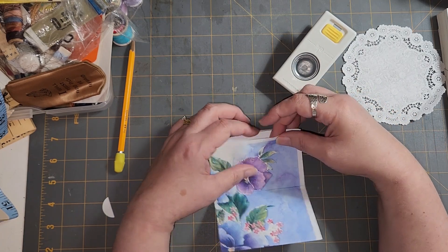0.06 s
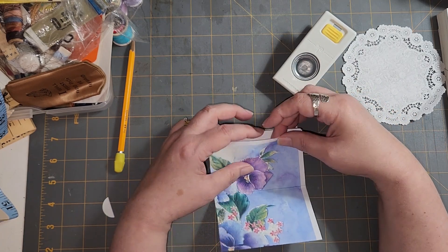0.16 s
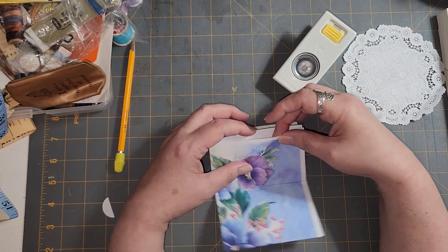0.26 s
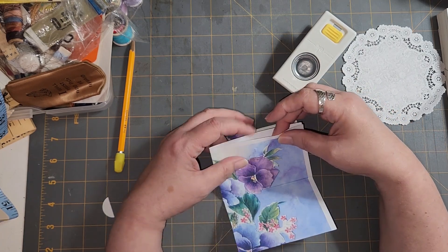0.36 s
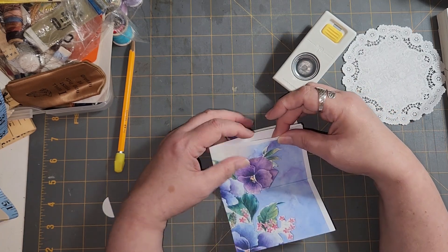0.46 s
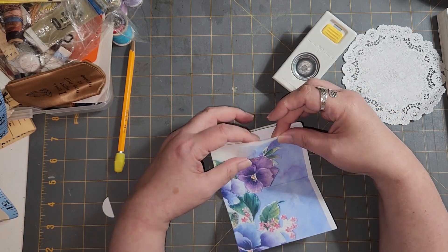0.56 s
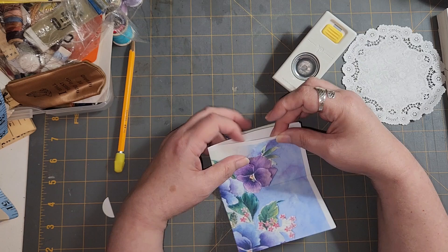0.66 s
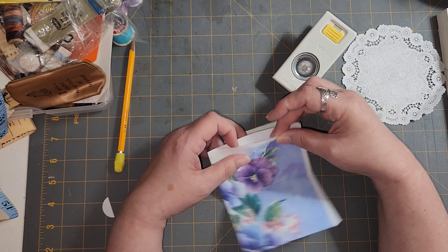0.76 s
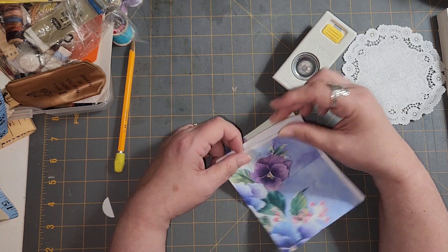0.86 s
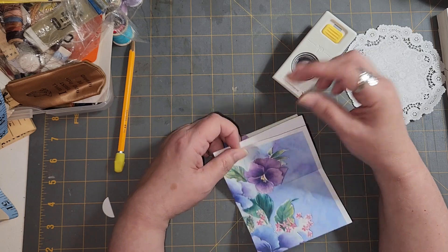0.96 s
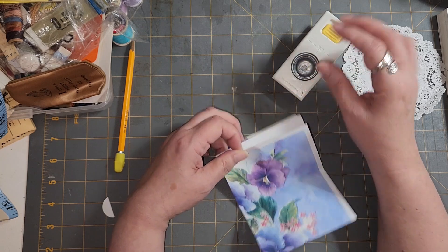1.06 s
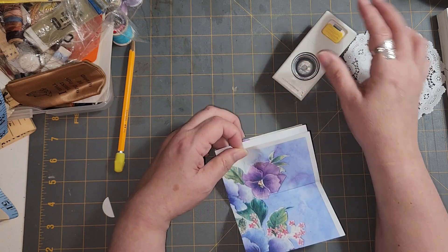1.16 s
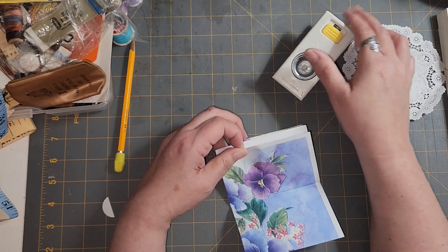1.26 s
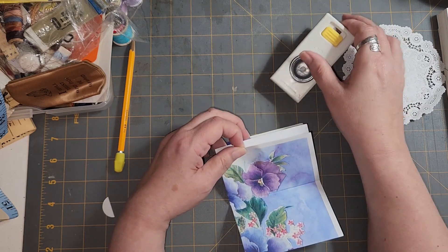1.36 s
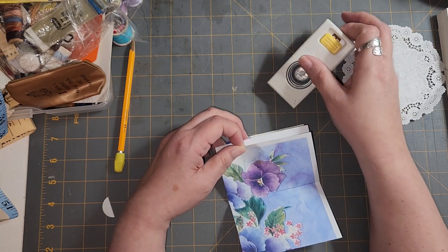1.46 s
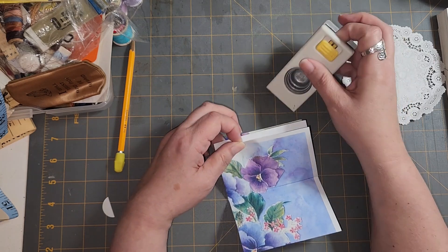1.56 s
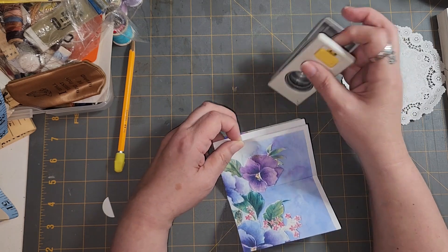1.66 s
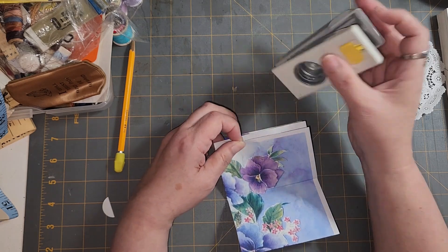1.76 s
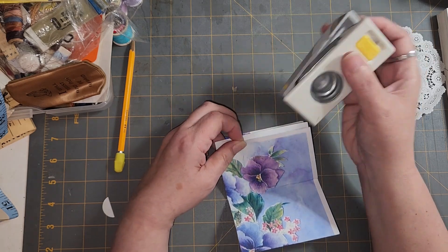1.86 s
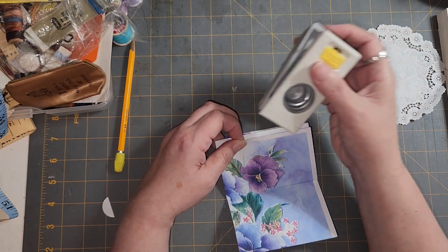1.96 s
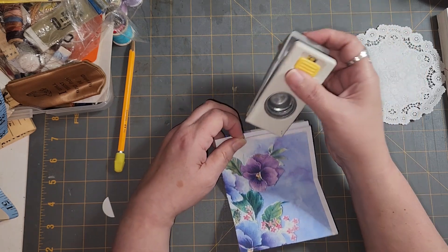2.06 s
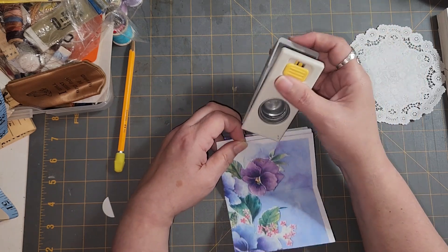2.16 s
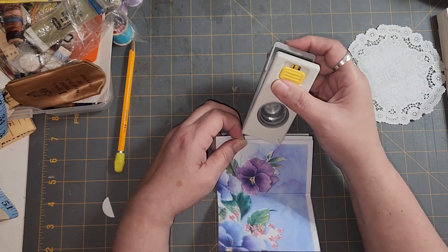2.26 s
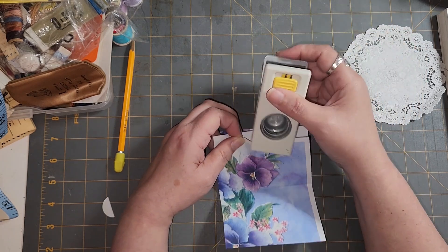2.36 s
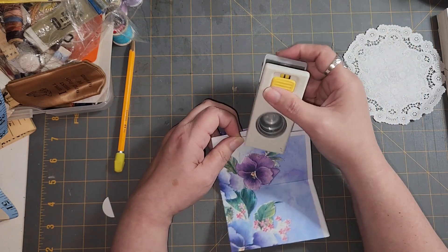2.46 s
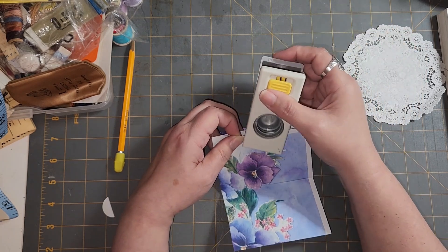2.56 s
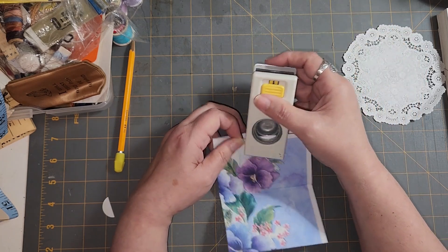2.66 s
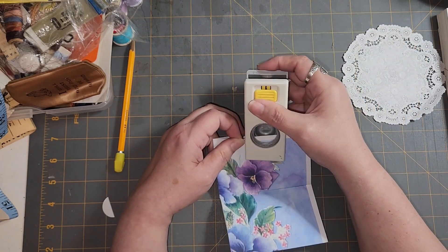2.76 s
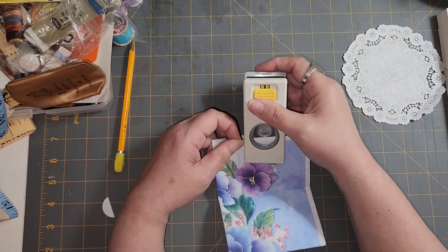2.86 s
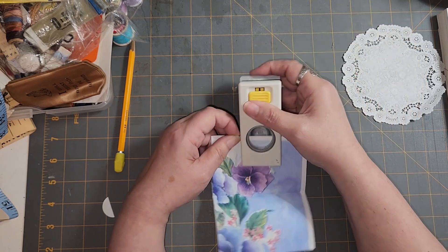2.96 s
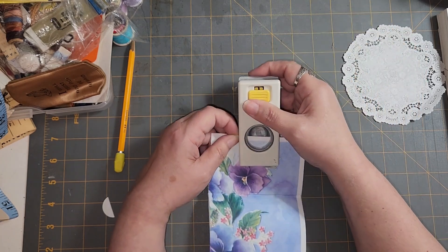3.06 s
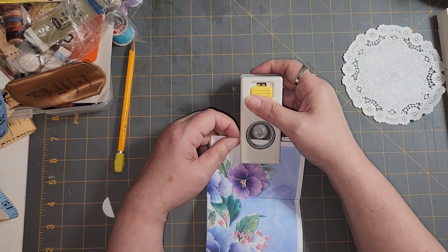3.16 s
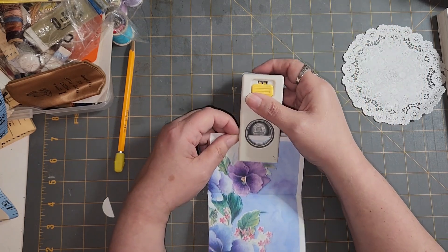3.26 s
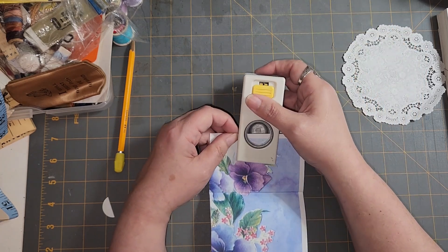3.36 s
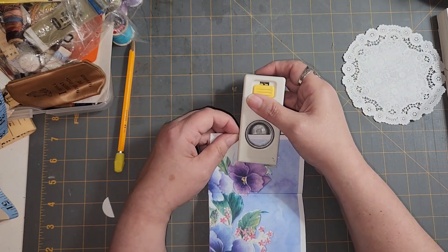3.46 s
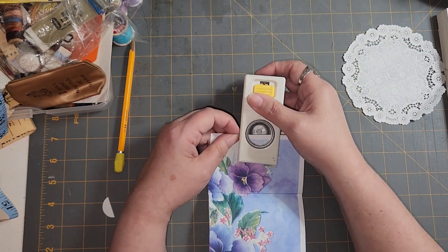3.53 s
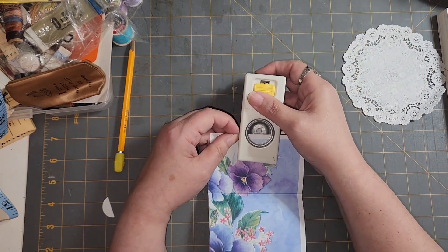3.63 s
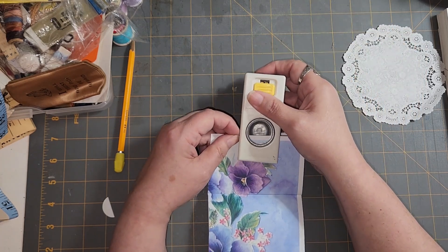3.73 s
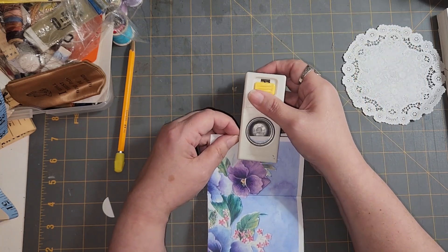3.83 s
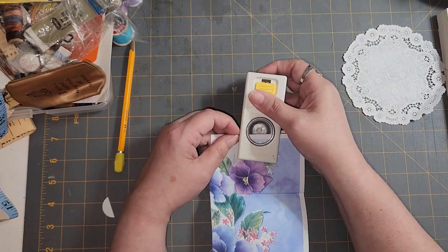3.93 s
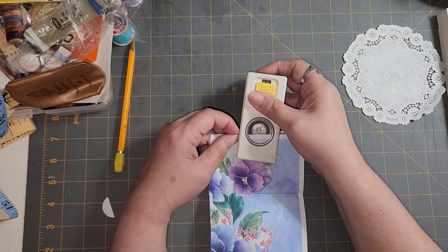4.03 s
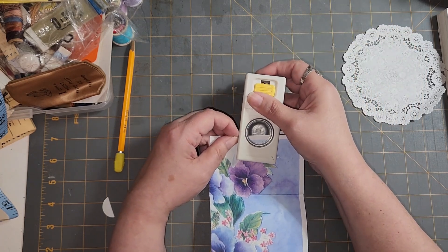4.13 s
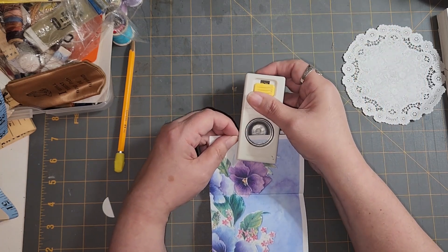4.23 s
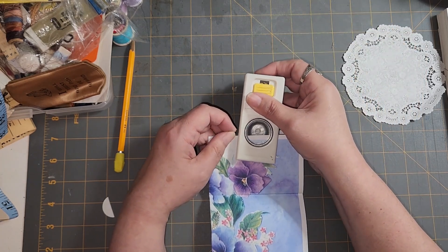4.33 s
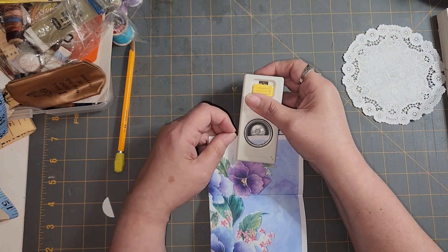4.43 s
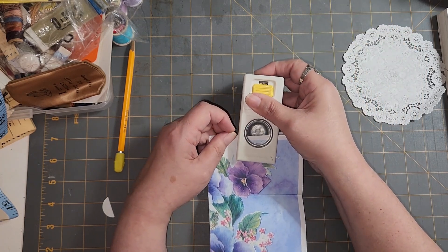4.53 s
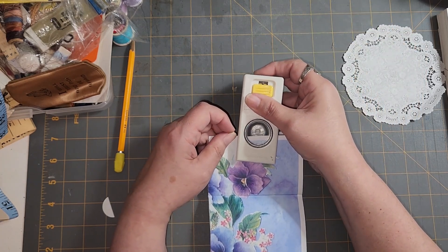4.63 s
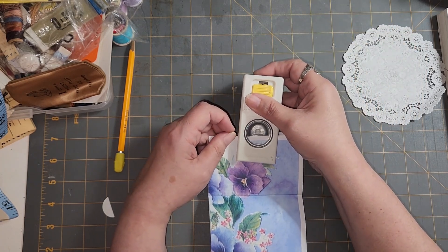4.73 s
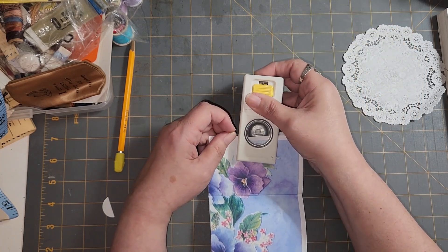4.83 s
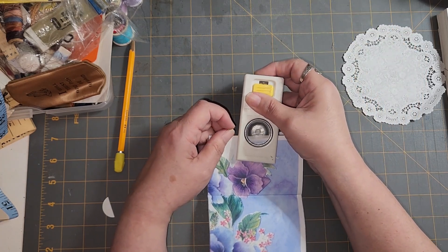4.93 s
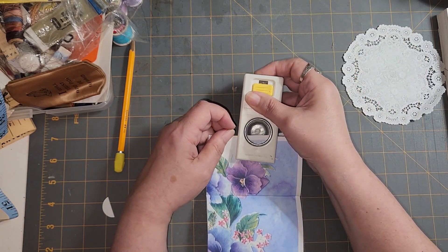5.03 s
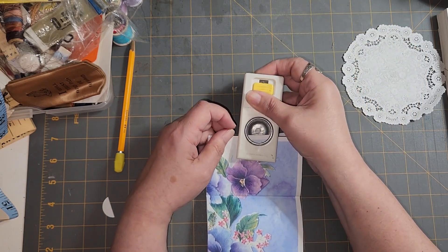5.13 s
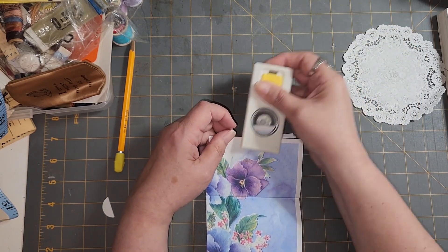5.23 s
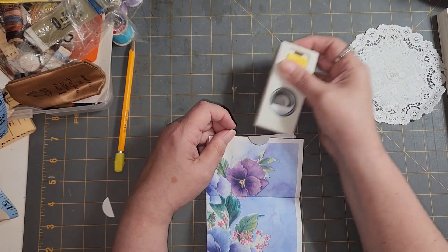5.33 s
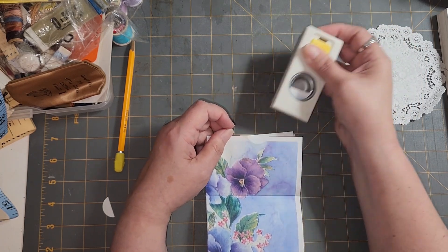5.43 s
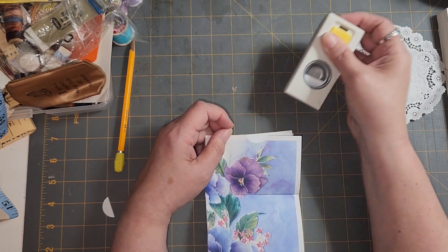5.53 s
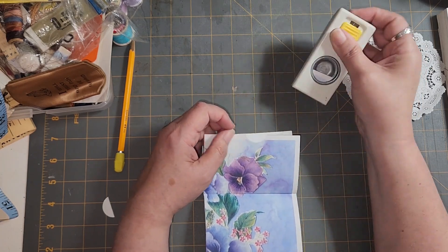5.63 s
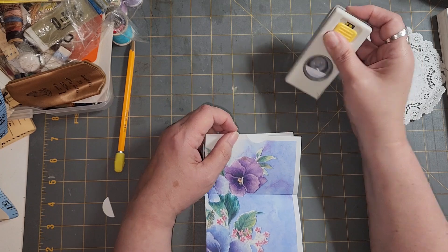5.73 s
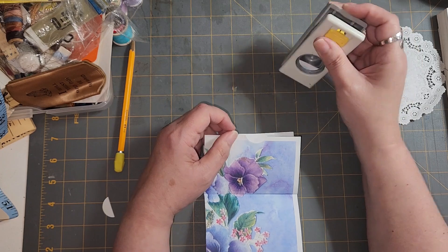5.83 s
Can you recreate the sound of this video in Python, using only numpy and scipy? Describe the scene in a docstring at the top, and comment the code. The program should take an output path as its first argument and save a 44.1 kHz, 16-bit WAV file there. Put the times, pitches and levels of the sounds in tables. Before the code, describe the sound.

Close stereo pickup at a craft desk in a small, softly humming room. Card slides and crackles on a mat, then a dull thump as a punch is grabbed. It clacks and rattles onto the card, which rubs into the slot. The case creaks, the die bites with a crunch, snaps hard at about five seconds, and a spring creaks at the end.

```python
"""A small room with a low hum: hands slide a folded paper card over a cutting mat and pick up a lever punch.
They work the card into its slot and squeeze: the case creaks, the desk thumps, the die snaps through.
The punch is lifted off and its spring creaks as it opens.
Contacts are struck modes and noise bursts, rubbing is grainy filtered noise, the spring sticks and slips."""
import sys
import numpy as np
from scipy import signal
from scipy.fft import rfft, irfft, next_fast_len
from scipy.io import wavfile
from scipy.ndimage import uniform_filter1d, map_coordinates

SR = 44100
rng = np.random.default_rng(int(sys.argv[2]) if len(sys.argv) > 2 else 0)


def log_audio(samples):
    """Write samples as a 16-bit WAV file to the path given in sys.argv[1]."""
    # one column per channel
    frames = np.atleast_2d(samples).T
    # limit to full scale, then quantise
    limited = np.clip(frames, -1, 1)
    pcm = np.round(limited * 32767).astype(np.int16)
    wavfile.write(sys.argv[1], SR, pcm)


N = 259749
T = np.arange(SR // 2) / SR  # time since a contact [s]


def amp(db):
    """Amplitude factor of a level in dB."""
    return 10 ** (np.asarray(db) / 20)


def unit(x):
    """Scale to rms 1."""
    return x / np.sqrt(np.mean(x ** 2) + 1e-20)


def crest(x):
    """Scale so that the loudest 4 ms have rms 1."""
    power = np.mean(np.atleast_2d(x) ** 2, axis=0)
    return x / np.sqrt(uniform_filter1d(power, size=176, mode="constant").max())


def along(points, hz):
    """Interpolate (Hz, value) points on a log frequency axis."""
    f, v = np.transpose(points)
    return np.interp(np.log(hz + 1), np.log(f + 1), v)


def wobble(rate_hz):
    """A smooth random curve with rate_hz knots a second."""
    knots = rng.standard_normal(int(N * rate_hz / SR) + 4)
    return map_coordinates(knots, [np.arange(N) * rate_hz / SR])


def filtered(x, response):
    """Apply a response of frequency to x."""
    n = x.shape[-1]
    m = next_fast_len(n + 2048)
    return irfft(rfft(x, m) * response(np.fft.rfftfreq(m, 1 / SR)), m)[..., :n]


def band(hz, lo_hz, hi_hz):
    """Gain of a steep band-pass."""
    return ((1 + (lo_hz / (hz + 1)) ** 8) * (1 + (hz / hi_hz) ** 8)) ** -.5


# Stereo width: (frequency [Hz], left-right correlation [0-1])
LIKENESS = [(200, 0.79), (1200, 0.61), (2500, 0.6), (5000, 0.16), (9000, 0)]


def spread(pair, colour):
    """Two unrelated signals become a coloured stereo pair, alike in the bass and unrelated in the treble."""
    def mid_side_gain(hz):
        turn = np.arccos(np.clip(along(LIKENESS, hz), -1, 1)) / 2
        return colour(hz) * np.array([np.cos(turn), np.sin(turn)])
    mid, side = filtered(pair, mid_side_gain)
    return unit(np.array([mid + side, mid - side]))


def noise(n):
    """Two unrelated channels of white noise."""
    return rng.standard_normal((2, n))


def decay(t, t60, attack):
    """A quick rise and an exponential fall, both times in s."""
    return (1 - np.exp(-t / attack)) * np.exp(-np.log(1000) * t / t60)


def burst(colour, t60, attack):
    """A dense cluster of short-lived modes, in stereo, that builds up while the contact lasts."""
    t = T[:SR // 8]
    x = spread(noise(len(t)), colour) * decay(t, t60, attack)
    return crest(x * (1 - np.exp(-t / attack)))


def ring(modes, attack, scatter_db):
    """Decaying sine modes, struck at new strengths each time."""
    out = np.zeros(len(T))
    for hz, db, t60 in modes:
        strength = amp(db + scatter_db * rng.standard_normal())
        out += strength * np.sin(2 * np.pi * hz * T) * decay(T, t60, attack)
    return out


def add(track, s, x):
    """Mix x into the track from time s."""
    start = max(round(s * SR), 0)
    part = track[..., start:start + x.shape[-1]]
    part += x[..., :part.shape[-1]]


# Still air: (frequency [Hz], relative density [dB per Hz])
AIR_SPECTRUM = [(25, -5.5), (100, -1.5), (190, -12), (700, -19), (2000, -15.5), (6000, -24.5),
                (16000, -38.5)]
# Higher hum before its waver: (time [s], level [dB])
HUM_SWELL_CURVE = [(2.6, -77.5), (3.15, -68), (3.5, -69.5), (4.1, -78.5)]
DEEP_HUM_HZ, DEEP_HUM_DB, HIGH_HUM_HZ = 48.4, -76, 237.6


def background(air_db):
    """Room air as shaped noise, and two sine hums wavering in level and phase; the higher one swells."""
    t = np.arange(N) / SR

    def hum(hz, db):
        level = amp(db + 2.5 * wobble(3))
        return level * np.sin(2 * np.pi * hz * t + 0.72 * wobble(11))

    air = spread(noise(N), lambda f: amp(along(AIR_SPECTRUM, f)))
    high_hum = hum(HIGH_HUM_HZ, np.interp(t, *np.transpose(HUM_SWELL_CURVE)))
    return amp(air_db) * air + hum(DEEP_HUM_HZ, DEEP_HUM_DB) + high_hum


# Metal modes of the punch: (frequency [Hz], level [dB], t60 [s])
PUNCH_MODES = [(1675, 7, 0.019), (1831, 8, 0.0084), (1936, 14, 0.019), (2610, -5.5, 0.042),
               (3020, -20, 0.07), (3036, -16.5, 0.11), (3650, 0, 0.036), (4175, 3, 0.039),
               (4950, -5, 0.051), (6540, -37, 0.22)]
# Bright crack of the metal: (frequency [Hz], relative density [dB per Hz])
CRACK_SPECTRUM = [(2500, -27), (4200, 8.5), (6000, 9), (8000, 3), (10500, 4.5), (16000, -7)]


def metal(modes_db, clatter_db, crack_db, crack_t60, crack_attack, clatter_t60):
    """Struck metal: its modes, a short clatter and a bright crack."""
    out = np.zeros((2, len(T)))
    detune = 1 + 0.015 * rng.standard_normal(len(PUNCH_MODES))  # the grip retunes the metal at every blow
    modes = [(f * d, db, t60) for (f, db, t60), d in zip(PUNCH_MODES, detune)]
    out += amp(modes_db) * crest(ring(modes, crack_attack, scatter_db=5.5))
    add(out, 0, amp(clatter_db) * burst(lambda f: band(f, 1070, 2920), clatter_t60, crack_attack))
    crack = burst(lambda f: amp(along(CRACK_SPECTRUM, f)), crack_t60, crack_attack)
    add(out, 0, amp(crack_db) * crack)
    return out


# Close modes of the plastic case: (ratio to its pitch [1], level [dB])
CASE_MODES = [(1, -3), (.93, -3), (1, -11.5), (0.94, 0)]


def shell(hz, t60, attack):
    """The plastic case rings briefly with a cluster of close modes."""
    modes = [(hz * ratio, db, t60) for ratio, db in CASE_MODES]
    return np.ones((2, 1)) * crest(ring(modes, attack, scatter_db=7))


def knock():
    """The dull answer of the mat: a burst of low-band noise."""
    return burst(lambda f: band(f, 274, 570), t60=0.11, attack=0.00016)


# Card and punch tap the mat and each other:
# (time [s], case pitch [Hz], level [dB], contact softness as low-pass cut-off [Hz], clatter t60 [s])
TAP_EVENTS = [(0.0186, 1033, -42, 4200, 0.01), (0.111, 1120, -54.5, 3500, .025),
              (0.42, 1170, -52.5, 2500, .06), (1.008, 1224, -43, 1500, 0.033),
              (1.333, 1154, -51.5, 500, 0.033), (2.162, 1190, -41, 3270, 0.012),
              (2.261, 1090, -45, 4380, 0.013), (2.4456, 1370, -26, 17000, 0.014),
              (2.544, 1196, -39, 3940, 0.044), (2.578, 913, -44.5, 2480, .022),
              (2.618, 1106, -44, 3680, 0.042), (2.836, 1384, -33, 3220, 0.054),
              (3.1544, 1430, -35, 4400, 0.022), (4.314, 1230, -43.5, 1670, .06),
              (4.433, 1408, -32, 4900, 0.026), (5.197, 1220, -49, 804, .04),
              (5.446, 1417, -56.5, 708, 0.031), (5.518, 1440, -60, 1200, 0.033)]
KNOCK_GROWTH_DB_PER_DB = 0.05  # lighter taps reach the mat relatively less


def taps():
    """A softer contact rings the case but hardly the metal, a glancing one clatters longer."""
    out = np.zeros((2, N))
    loudest_db = max(row[2] for row in TAP_EVENTS)
    for s, hz, db, soft_hz, t60 in TAP_EVENTS:
        die = metal(modes_db=0.5, clatter_db=2.5, crack_db=2.0,
                    crack_t60=t60 / 2, crack_attack=0.0011, clatter_t60=t60)
        softener = signal.butter(2, min(soft_hz, 0.45 * SR), fs=SR)
        knock_db = db - 18 + KNOCK_GROWTH_DB_PER_DB * (db - loudest_db)
        add(out, s, amp(db) * signal.lfilter(*softener, die))
        add(out, s, amp(db - 2.5) * shell(hz, t60=0.051, attack=0.00064))
        add(out, s, amp(knock_db) * knock())
    return out


FADE_DB_PER_S = 385  # outside a movement


def movement(curve):
    """Strength of one continuous rubbing movement, dying away outside it."""
    t = np.arange(N) / SR
    s, db = np.transpose(curve)
    outside_s = np.abs(t - np.clip(t, s[0], s[-1]))
    return amp(np.interp(t, s, db) - FADE_DB_PER_S * outside_s)


def strokes(rows, roundness):
    """Strength of separate strokes, each speeding up and slowing."""
    t = np.arange(N) / SR
    out = np.zeros(N)
    for s, half_s, db in rows:
        distance = np.minimum(np.abs((t - s) / half_s), 10)
        out += amp(db) * np.exp(-distance ** roundness)
    return out


def patchy(x, depth_db):
    """The colour drifts as other parts of the surfaces touch: a smoothed random gain over time and pitch."""
    z = signal.stft(x, nperseg=512)[2]
    field = rng.standard_normal(z.shape[1:])
    field = uniform_filter1d(uniform_filter1d(field, size=6, axis=0), size=7, axis=1)
    return unit(signal.istft(z * amp(depth_db * unit(field)), nperseg=512)[1][:, :N])


def friction(strength, spectrum, grain_db, crinkle_db, patchy_db, rasp_db, hiss_db):
    """Fibres catch and let go in clumped grains, a rasp with a fine hiss above it."""
    catches = unit(amp(grain_db * wobble(700)))
    crinkles = unit(amp(crinkle_db * np.clip(wobble(220) - 1, 0, 1)))  # occasional snags of an edge

    def grains(grip, lo_hz, hi_hz):
        return spread(grip * noise(N), lambda f: amp(along(spectrum, f)) * band(f, lo_hz, hi_hz))

    rasp = patchy(grains(catches * crinkles, 346, 6070), patchy_db)
    hiss = grains(catches, 4320, 19000)
    return strength * (amp(rasp_db) * rasp + amp(hiss_db) * hiss)


# Card slides over the mat: (time [s], rubbing strength [dB])
SLIDE_CURVE = [(0.03, -53.5), (0.128, -58), (0.156, -49.5), (0.244, -75.5), (0.266, -54.5), (0.344, -58.5),
               (0.376, -45), (0.518, -87), (0.55, -58.5), (0.612, -79), (0.636, -58.5), (0.646, -62),
               (0.838, -56), (0.862, -43), (0.902, -38), (0.92, -49.5), (1.068, -59.5), (1.132, -51.5),
               (1.208, -58.5)]
# Card on mat: (frequency [Hz], relative density [dB per Hz])
CARD_SPECTRUM = [(180, -60), (300, -3.5), (360, -12), (725, -12), (1970, 1.5), (3000, -3), (11900, -6.5),
                 (16000, -14)]


def slide():
    """The card rubs along the mat: grainy noise under a strength curve."""
    return friction(movement(SLIDE_CURVE), CARD_SPECTRUM, grain_db=1.5, crinkle_db=-1,
                    patchy_db=2.5, rasp_db=-2.5, hiss_db=-2.0)


def crackles(strength, rate_hz, pitch_hz, level_db, scatter_db):
    """Edges of the rubbing card snag and flick free at random times, each tick with its own size and pitch."""
    out = np.zeros((2, N))
    t = T[:SR // 80]
    for where, size, height in rng.random((int(rate_hz * N / SR), 3)):
        hz = pitch_hz * 4 ** (height - .5)
        edges_hz = [hz / 1.5, min(hz * 1.5, .45 * SR)]
        flick = noise(len(t)) * decay(t, t60=0.011, attack=0.00011)
        crossed = flick + flick[::-1] / 2  # narrows the stereo
        body = signal.lfilter(*signal.butter(2, edges_hz, "bandpass", fs=SR), crossed)
        add(out, where * N / SR, amp(level_db - scatter_db * np.sqrt(size)) * crest(body))
    return strength * out


# Dull low thuds on the mat, a soft tap and then the punch rocking:
# (time [s], peak level of the modes [dB], contact softness as cut-off [Hz])
THUD_EVENTS = [(0.23, -54, 700), (1.392, -44, 200), (1.468, -30.5, 400), (1.487, -19.5, 746),
               (1.677, -44.5, 405)]
# Mat modes: (frequency [Hz], level [dB], t60 [s])
MAT_MODES = [(121, -11, 0.2), (163, -6.5, 0.18), (234.7, -5, 0.27), (264.4, 13, 0.034), (319.4, -13, 0.29),
             (479, -8, 0.021), (757, -19.5, 0.079)]


def thuds():
    """Dull low thuds ring the mat; a softer contact leaves the upper modes and the knock weaker."""
    out = np.zeros((2, N))
    for s, db, soft_hz in THUD_EVENTS:
        modes = [(hz, level - 20 * np.log10(1 + (hz / soft_hz) ** 2), t60) for hz, level, t60 in MAT_MODES]
        thud = ring(modes, attack=0.00155, scatter_db=0.5)
        add(out, s, amp(db) * thud / np.abs(thud).max())
        add(out, s, amp(db - 16.0) * knock() / (1 + (430 / soft_hz) ** 2))
    return out


# Small metallic ticks of the lever, finger ring and spring:
# (time [s], level [dB], crack relative to that level [dB])
CLICK_EVENTS = [(0.632, -58.5, 4), (1.247, -59.5, -27), (1.363, -49, -3), (1.467, -50.5, -7),
                (1.485, -45.5, -6.5), (1.563, -52, -5.5), (1.697, -63, 7.5), (1.863, -58.5, 1),
                (1.902, -51.5, 7), (2.005, -55.5, 9.5), (2.421, -42.5, -1), (4.736, -60.5, -1),
                (5.107, -59, 6.5), (5.189, -56.5, 1.5), (5.733, -54.5, 3.5), (5.775, -55.5, 3.5)]


def clicks():
    """Small metallic ticks: struck metal without case or mat."""
    out = np.zeros((2, N))
    for s, db, crack_db in CLICK_EVENTS:
        tick = metal(modes_db=0.0, clatter_db=-0.5, crack_db=crack_db,
                     crack_t60=0.016, crack_attack=0.0015, clatter_t60=0.041)
        add(out, s, amp(db) * tick)
    return out


# Card edge drags over the mat: (middle time [s], half length [s], level [dB])
SCUFF_STROKES = [(0.757, .018, -56.5), (1.968, .013, -56.5), (2.999, 0.019, -47)]
SCUFF_HZ, SCUFF_WIDTH_HZ = 1940, 260  # resonance of the dragged edge


def scuffs():
    """The dragged edge sings for a moment: grainy rubbing through one narrow resonance."""
    grains = unit(amp(4 * wobble(300))) * noise(N)
    edge = spread(grains, lambda f: 1 / (1 + ((f - SCUFF_HZ) / SCUFF_WIDTH_HZ) ** 2))
    return strokes(SCUFF_STROKES, roundness=2) * edge


# Grabbing and squeezing jolts the desk: (time [s], peak level [dB])
JOLT_EVENTS = [(1.392, -31.5), (4.002, -50), (4.159, -44.5), (4.243, -41.5), (4.281, -39.5), (4.875, -34),
               (4.967, -33.5), (5.001, -40.5), (5.021, -30.5)]
# Desk modes: (frequency [Hz], level [dB], t60 [s])
DESK_MODES = [(50, -13.5, 0.49), (94.3, -3, 0.23), (121.6, -3.5, 0.13), (158, -5, 0.0565),
              (235.5, -10.5, 0.077)]


def jolts():
    """Low modes of the desk top, struck through the punch."""
    out = np.zeros((2, N))
    for s, db in JOLT_EVENTS:
        jolt = ring(DESK_MODES, attack=0.0027, scatter_db=6)
        add(out, s, amp(db) * jolt / np.abs(jolt).max())
    return out


# Hand shifts its hold on the punch: (middle time [s], half length [s], rubbing strength [dB])
HOLD_STROKES = [(1.445, 0.022, -58), (1.56, 0.069, -65.5), (1.99, 0.063, -62), (3.96, 0.013, -56.5),
                (5.33, 0.037, -57), (5.71, 0.042, -64.5)]
# Rubbing at the punch and its slot: (frequency [Hz], relative density [dB per Hz])
SLOT_SPECTRUM = [(180, -41), (300, -15), (656, -14.5), (1780, 0), (3200, -10), (6410, -13), (8360, -18),
                 (9390, -16), (16000, -26)]


def hold():
    """The hand rubs on the punch in short strokes of grainy noise."""
    return friction(strokes(HOLD_STROKES, roundness=1.14), SLOT_SPECTRUM, grain_db=1.5, crinkle_db=3.5,
                    patchy_db=0, rasp_db=1.0, hiss_db=0.0)


# Spring flexes: (time [s], length [s], level before swell and chance [dB], strongest pitch at the start [Hz])
FLEX_EVENTS = [(1.734, 0.005, -53, 3000), (1.896, 0.005, -44.5, 1970), (5.7945, 0.09, -42.5, 2760)]
# Spring modes at the start of a flex: (frequency [Hz], level [dB])
SPRING_MODES = [(1530, 2), (1930, -0.5), (2220, 1), (2740, -4.5), (2920, 0.5), (4240, 5), (6450, 0)]
SLIP_S, SLIP_SCATTER = 0.0128, 0.12  # slip to slip, its share of chance
SAG_OCT_PER_S, FOCUS_DB_PER_OCT = 5, 16  # strongest pitch sinks; modes away from it are weaker
COIL_SAG_OCT_PER_S, COIL_T60_S = 0.39, 0.057  # every mode glides down as the coil unwinds
COIL_DETUNE = 0.015  # each slip leaves the turns touching differently
SWELL_DB = 2.5  # the middle of a flex is loudest


def coil_ring(pitch_hz, t):
    """One slip rings the coil, mostly the modes near pitch_hz, t seconds into the flex."""
    cycles = np.cumsum(2 ** (-COIL_SAG_OCT_PER_S * (t + T))) / SR
    coil = np.zeros(len(T))
    for hz, level_db in SPRING_MODES:
        loud, detune, *phase = rng.standard_normal(4)
        level_db = level_db - FOCUS_DB_PER_OCT * abs(np.log2(hz / pitch_hz)) + 5.7 * loud
        angle = 2 * np.pi * hz * (1 + COIL_DETUNE * detune) * cycles
        # one random phase for each stereo channel
        coil = coil + amp(level_db) * np.sin(angle + 0.82 * np.array(phase)[:, None])
    return crest(coil * decay(T, COIL_T60_S, attack=0.00076))


def spring():
    """Stick and slip: each slip scratches and rings the coil; lower modes take over as the lever opens."""
    out = np.zeros((2, N))
    for s, length_s, db, start_hz in FLEX_EVENTS:
        for t in np.arange(0, length_s, SLIP_S):
            late, force = rng.standard_normal(2)
            coil = coil_ring(start_hz * 2 ** (-SAG_OCT_PER_S * t), t)
            scratch = spread(noise(len(T)), lambda f: band(f, 1400, 3300) ** .5)
            scratch = crest(scratch * decay(T, COIL_T60_S, attack=1e-3))
            strength = amp(db + SWELL_DB * (np.sin(np.pi * t / length_s) - 2.0) + 2 * force)
            add(out, s + t + SLIP_S * SLIP_SCATTER * late, strength * (coil + amp(-10.5) * scratch))
    return out


# Card is worked into the slot: (time [s], rubbing strength [dB])
INSERT_CURVE = [(2.12, -72), (2.19, -52.5), (2.25, -72.5), (2.275, -47), (2.305, -42), (2.355, -74),
                (2.42, -45), (2.56, -55.5), (2.66, -60), (2.77, -49.5), (2.88, -60.5), (2.968, -55.5),
                (2.995, -49.5), (3.043, -54.5), (3.072, -44), (3.12, -66.5), (3.19, -48), (3.28, -72),
                (3.35, -55), (3.45, -66.5)]


def insert():
    """The card rubs in the slot: crinkled grainy noise under a strength curve."""
    return friction(movement(INSERT_CURVE), SLOT_SPECTRUM, grain_db=3.0, crinkle_db=12,
                    patchy_db=1.5, rasp_db=0.0, hiss_db=-3.5)


# Short creaks and scrapes of the handled case: (time [s], rubbing strength [dB])
CREAK_EVENTS = [(3.484, -55.5), (3.587, -60), (3.73, -52.5), (3.852, -56), (3.993, -44.5), (4.112, -43),
                (4.143, -51), (4.362, -48.5), (4.51, -52.5), (4.585, -49.5)]
CREAK_ATTACK_S, CREAK_T60_S = 0.0018, 0.18


def creaks():
    """Short creaks and scrapes of the handled case: grainy noise, quick to start and slow to fade."""
    strength = np.zeros(N)
    shape = decay(T, CREAK_T60_S, CREAK_ATTACK_S)
    for s, db in CREAK_EVENTS:
        add(strength, s, amp(db) * shape / shape.max())
    return friction(strength, SLOT_SPECTRUM, grain_db=3.0, crinkle_db=8.5,
                    patchy_db=3.0, rasp_db=-1.5, hiss_db=-15.0)


# Die bites, then snaps through: (time [s], case pitch [Hz], level [dB], case ring relative to that level [dB])
SNAP_EVENTS = [(4.241, 1286, -38.5, -1), (4.278, 1213, -40, 4.5), (4.872, 1232, -28.5, 7.5),
               (4.962, 1165, -38.5, 9), (5.0008, 1400, -30, 0), (5.0034, 1321, -30.5, 14.5),
               (5.014, 1266, -31.5, 8)]
LINGER_DB, LINGER_T60_S = -31, 0.33  # the clunk hangs in the room


def snaps():
    """Heavy snaps of the cut, a little to the left: metal, case, knock and a lingering band of noise."""
    out = np.zeros((2, N))
    for s, hz, db, ring_db in SNAP_EVENTS:
        die = metal(modes_db=-1.5, clatter_db=0.6, crack_db=-2.5,
                    crack_t60=0.022, crack_attack=0.0013, clatter_t60=0.043)
        add(out, s, amp(db) * die)
        add(out, s, amp(db + ring_db) * shell(hz, t60=0.02, attack=0.0055))
        add(out, s, amp(db - 11.5) * knock())
        halo = spread(noise(len(T)), lambda f: band(f / hz, .82, 1.17) ** 2)
        add(out, s, amp(db + ring_db + LINGER_DB) * halo * decay(T, LINGER_T60_S, attack=0.0061))
    return out * amp([[.7], [-.7]])


# Blade crunches through the fibres: (middle time [s], half length [s], level [dB])
CUT_STROKES = [(4.249, 0.013, -53), (4.271, 0.0044, -45), (4.286, .006, -49.5)]


def crunch():
    """Bright, grainy tearing as the blade shears the card."""
    fibres = unit(amp(6 * wobble(900))) * noise(N)
    return strokes(CUT_STROKES, roundness=2.4) * spread(fibres, lambda f: band(f, 2000, 13000))


# Diffuse tail: (frequency [Hz], t60 [s])
ROOM_T60 = [(150, 0.5), (1300, 0.34), (5000, 0.36), (14000, 0.32)]


def room(x, early_db, tail_db):
    """Desk and near walls answer with a short noise that builds over some milliseconds, plus a diffuse tail."""
    hz, t, z = signal.stft(spread(noise(len(T)), np.ones_like), SR, nperseg=256)
    fall = decay(t, along(ROOM_T60, hz)[:, None], attack=0.00075)
    tail = signal.istft(z * fall, SR, nperseg=256)[1]
    early = spread(noise(len(T)), np.ones_like) * decay(T, t60=0.062, attack=0.0086)
    echo = amp(tail_db) * unit(tail[:, :len(T)]) + amp(early_db) * unit(early)
    return signal.fftconvolve(x, echo / np.sqrt(len(T)), axes=1)[:, :N]


def scene():
    """Punch, card and desk in the room."""
    rubbing = movement(SLIDE_CURVE) + movement(INSERT_CURVE)
    edges = crackles(rubbing, rate_hz=120, pitch_hz=3340, level_db=4.5, scatter_db=21.5)
    card = slide() + edges + scuffs() + insert() + crunch()
    punch = taps() + clicks() + hold() + spring() + creaks() + snaps()
    bright = card + punch
    low = thuds() + jolts()
    bright_echo = room(bright, early_db=-8.0, tail_db=-11.5)
    low_echo = room(low, early_db=-12.5, tail_db=-11.5)
    return bright + bright_echo + low + low_echo + background(air_db=-66.5)


# Microphone response: (frequency [Hz], gain [dB])
MICROPHONE_RESPONSE = [(25, -7.5), (50, -1), (7900, -1.5), (8600, -7), (9300, 2)]
TOP_HZ = 16200  # nothing passes above


def record(dry):
    """The microphone thins the deepest bass and has a narrow treble notch; the left port hears slightly first."""
    lead_s = 2e-5 * np.array([[.5], [-.5]])

    def response(hz):
        gain = amp(along(MICROPHONE_RESPONSE, hz)) * (hz < TOP_HZ)
        return gain * np.exp(2j * np.pi * hz * lead_s)

    return filtered(dry, response)


dry = scene()
out = record(dry)
log_audio(out)
```